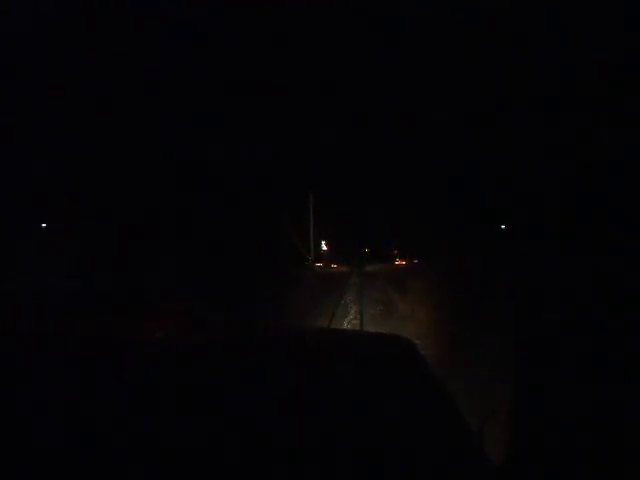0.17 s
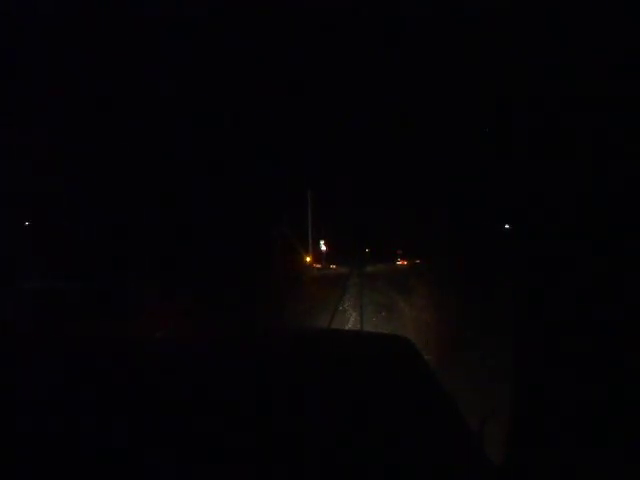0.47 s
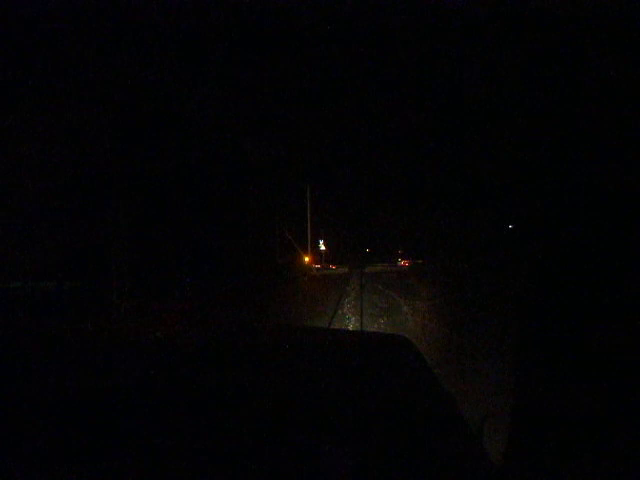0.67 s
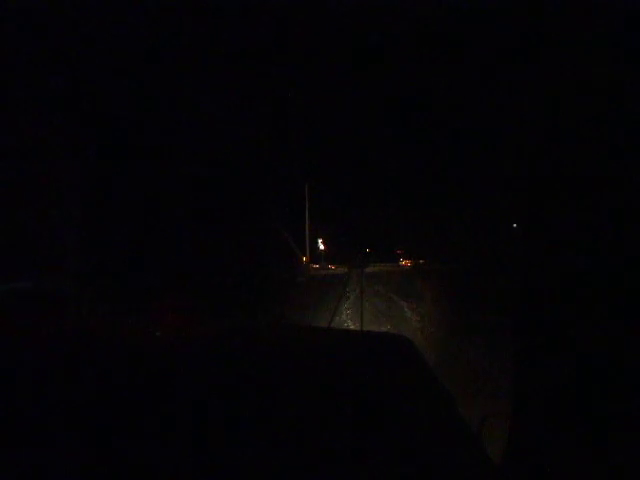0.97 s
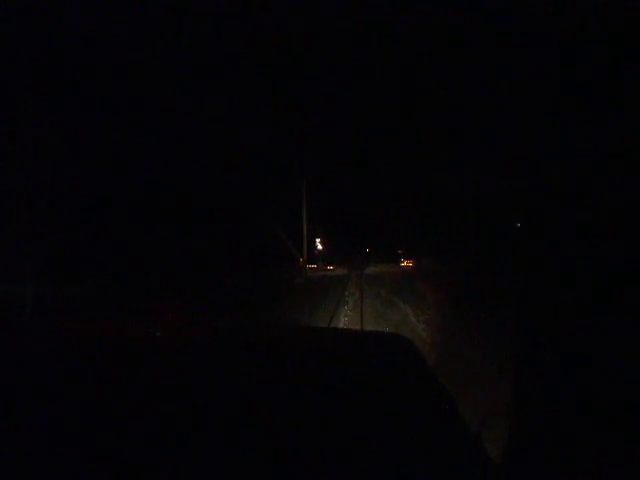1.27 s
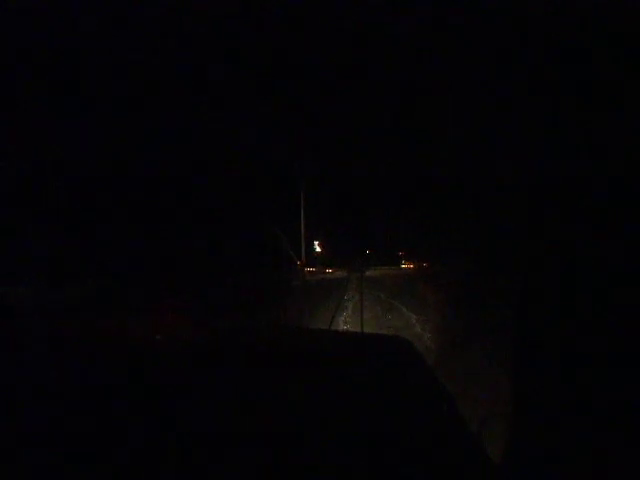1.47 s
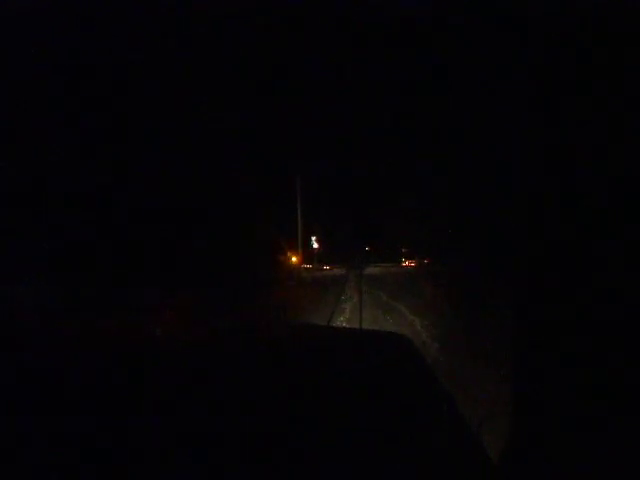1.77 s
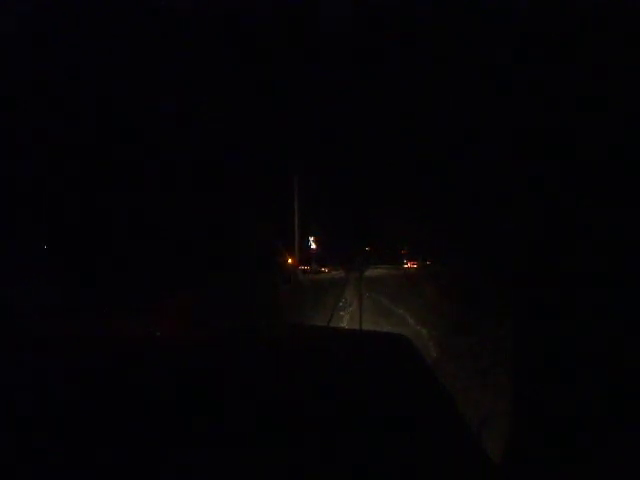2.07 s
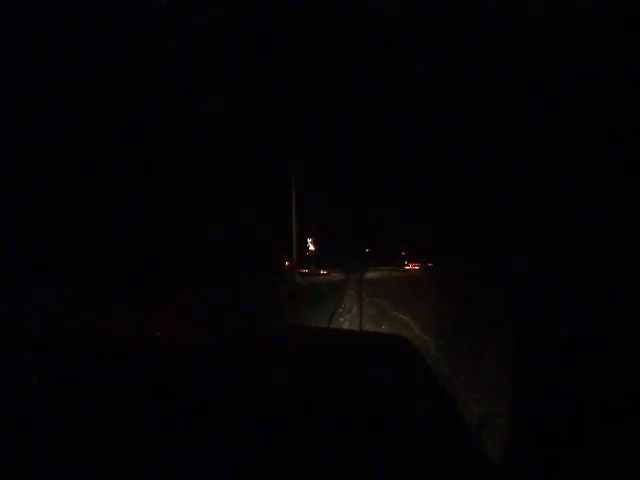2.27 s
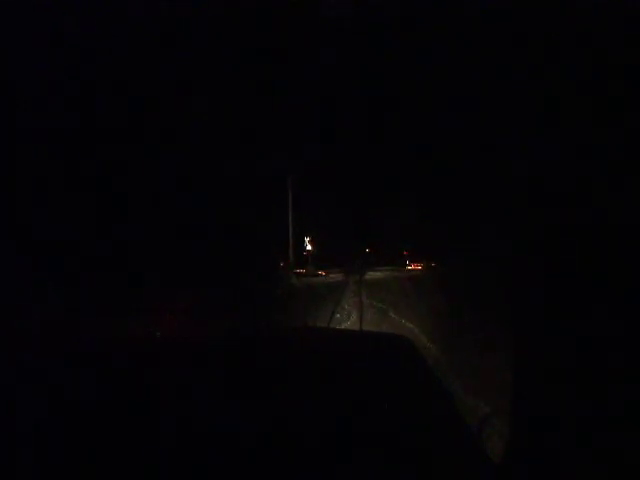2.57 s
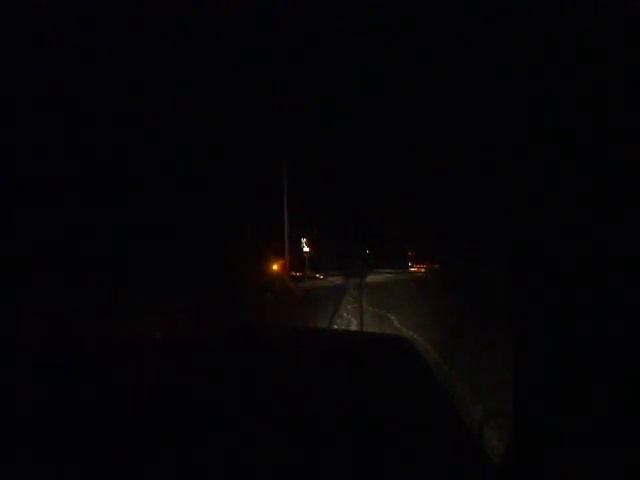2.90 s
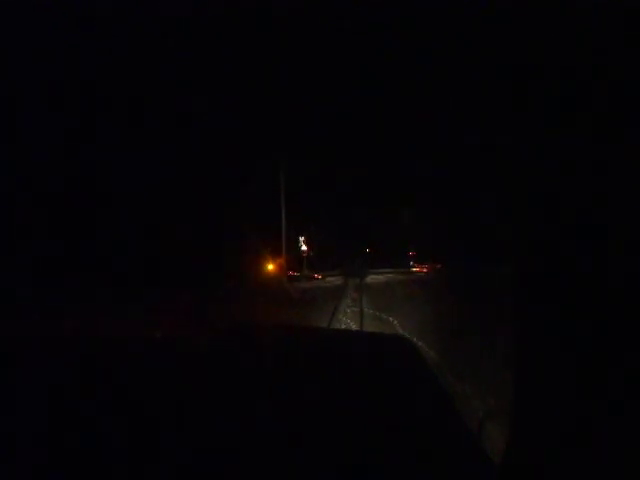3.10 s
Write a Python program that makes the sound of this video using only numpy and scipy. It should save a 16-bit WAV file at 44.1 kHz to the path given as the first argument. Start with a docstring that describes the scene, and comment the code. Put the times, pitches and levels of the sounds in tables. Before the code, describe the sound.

Locomotive horn sounds briefly at the start and near the end, over throbbing engine and hiss

```python
"""In the cab of a moving diesel locomotive, one microphone: a three-chime air horn gives two short blasts.
The first is already sounding. The chimes share one air valve: the lowest speaks first and hangs on longest
as the pressure drains; each is a stack of overtones, with a faint return from the trackside.
Underneath, the engine throbs in crankshaft orders and its blower and gears whine in steady tones;
shaped noise makes the rumbling wheels, the hissing air and a boom in the cab."""
import sys
import numpy as np
from scipy import signal
from scipy.fft import rfft, irfft
from scipy.io import wavfile
from scipy.ndimage import uniform_filter1d

SR = 44100
rng = np.random.default_rng(int(sys.argv[2]) if len(sys.argv) > 2 else 0)


def generate_wav(signal):
    """Clip the signal to [-1, 1] and save it as 16-bit WAV at the path in sys.argv[1]."""
    frames = np.transpose(np.atleast_2d(signal))
    scaled = np.clip(frames, -1, 1) * 32767
    pcm = np.round(scaled).astype(np.int16)
    wavfile.write(sys.argv[1], SR, pcm)


N = 142884
T = np.arange(N) / SR


def undb(db):
    """Decibels to gain."""
    return 10 ** (np.asarray(db) / 20)


def unit(x):
    """Scale to rms 1."""
    return x / np.sqrt(np.mean(x ** 2))


def walk(rate):
    """Smooth chance with spread near 1, changing about rate times a second."""
    hold = max(int(SR / rate), 2)
    held = np.repeat(rng.standard_normal(N // hold + 3), hold)[rng.integers(hold):]
    smooth = uniform_filter1d(uniform_filter1d(held, hold), hold)
    return 1.334 * smooth[:N]


def level_over_time(curve):
    """Level in dB at every sample, joined from (time, level) points."""
    return np.interp(T, *np.array(curve).T)


def swell(curve):
    """Gain that follows a level curve around its mean."""
    db = level_over_time(curve)
    return undb(db - db.mean())


def noise(gain):
    """Noise of rms 1 whose spectrum is gain(Hz)."""
    f = np.maximum(np.fft.rfftfreq(2 * N, 1 / SR), 1)
    spectrum = rfft(rng.standard_normal(2 * N)) * gain(f)
    return unit(irfft(spectrum)[:N])


def coloured(points):
    """Noise of rms 1 with a spectrum of (Hz, dB) points, joined on a log frequency scale."""
    hz, db = np.array(points).T
    return noise(lambda f: undb(np.interp(np.log(f), np.log(hz), db)))


def resonance(hz, width):
    """Noise of rms 1 gathered around one resonance; its amplitude halves at width from the centre."""
    return noise(lambda f: 1 / (1 + ((f - hz) / width) ** 2))


def turns(hz):
    """Phase in radians of something that turns at hz."""
    return 2 * np.pi * np.cumsum(hz) / SR


def tone(phase):
    """A partial of rms 1 that starts anywhere in its cycle."""
    return np.sqrt(2) * np.sin(phase + 2 * np.pi * rng.random())


# spectrum of the rolling rumble: (frequency [Hz], relative level per Hz [dB])
RUMBLE_SPECTRUM = [(10, -23), (25, -16.5), (40, -4.5), (54, 3), (70, -6), (88, 2.5), (110, -11),
                   (135, -3.5), (165, -15), (210, -11), (245, -13), (330, -15.5), (400, -15.5),
                   (500, -18.5), (700, -22.5), (930, -19.5), (1150, -29), (2000, -44), (5000, -59.5)]
RUMBLE_DB, RUMBLE_SWELL_DB = -26, 1.5
RUMBLE_DEPTH = .3  # share of the engine drone's swell, in dB, that the rumble follows


def rumble():
    """Wheels and body shake the cab: low noise, partly swelling with the engine."""
    level = undb(RUMBLE_DB + RUMBLE_SWELL_DB * walk(9.96))
    return level * swell(DRONE_LEVEL) ** RUMBLE_DEPTH * coloured(RUMBLE_SPECTRUM)


# spectrum of the air hiss: (frequency [Hz], relative level per Hz [dB])
HISS_SPECTRUM = [(500, -24), (1200, -1), (1550, 1.5), (2100, -2.5), (2800, -1), (3800, -1.5), (5000, 0.5),
                 (5800, -0.5), (6400, 1.5), (6950, -2), (7500, -3.5), (8000, -4), (8500, -16),
                 (9000, -42.5)]
# ringing of the ducts: (centre [Hz], width [Hz], level before flicker and treble swell [dB])
DUCTS = [(2840, 150, -51), (3173, 140, -44.5), (4510, 270, -42.5), (4770, 100, -48), (5340, 81, -49.5),
         (7350, 220, -49)]
# rise and fall of the treble, heard relative to its mean: (time [s], level [dB])
TREBLE_LEVEL = [(0, -34), (.25, -34), (.5, -31.5), (.87, -29), (1.0, -29.5), (1.4, -29.5), (1.68, -31),
                (2.0, -29.5), (2.45, -29.5), (2.57, -31.5), (2.7, -32.5), (2.83, -32), (2.94, -28.5),
                (3.2, -30)]
HISS_DB = -34.5
HISS_FLICKER_DB, HISS_FLICKER_RATE_HZ = .6, 14


def air():
    """Rushing air: a broad, flickering hiss and the resonances of its ducts."""
    ducts = sum(undb(db + 1.5 * walk(10)) * resonance(hz, width) for hz, width, db in DUCTS)
    hiss = undb(HISS_DB) * coloured(HISS_SPECTRUM)
    flicker = undb(HISS_FLICKER_DB * walk(HISS_FLICKER_RATE_HZ))
    return swell(TREBLE_LEVEL) * flicker * (hiss + ducts)


# level of the boom in the cab: (time [s], level [dB])
BOOM_LEVEL = [(0, -54), (.3, -50), (.6, -38), (.9, -46), (1.5, -42), (1.85, -34), (2.05, -46), (2.2, -29.5),
              (2.48, -31.5), (2.62, -47), (2.95, -39), (3.08, -29), (3.24, -35)]
BOOM_HZ, BOOM_WIDTH_HZ = 210.8, 8.6


def boom():
    """A low resonance of the cab comes and goes."""
    return undb(level_over_time(BOOM_LEVEL)) * resonance(BOOM_HZ, BOOM_WIDTH_HZ)


# engine orders: (multiple of the crank rate, level before flutter, swell and trim [dB])
ENGINE_ORDERS = [(3, -37), (4, -28.5), (5, -41), (6, -38), (7, -38), (8, -22), (9, -30.5), (10, -44),
                 (12, -42), (19, -48), (24, -46), (26, -47), (30, -37), (35, -48.5), (36, -46)]
# rise and fall of the engine's drone, heard relative to its mean: (time [s], level [dB])
DRONE_LEVEL = [(0, -25), (.25, -24), (.45, -21.5), (.56, -16.5), (.8, -20.5), (1.15, -18), (1.6, -14.5),
               (2.0, -17.5), (2.3, -16), (2.47, -23.5), (2.65, -27.5), (2.85, -22), (3.12, -16.5),
               (3.24, -25)]
CRANK_HZ, CRANK_WANDER = 10.95, .004  # wander as a fraction of the rate
ORDER_FLUTTER_DB, ENGINE_TRIM_DB = 1.5, -0.5
DRONE_DEPTH = .5  # share of the swell, in dB, that orders far from the firing rate follow


def engine():
    """Orders of the crankshaft beat against each other once a turn, each a little unsteady."""
    crank = turns(CRANK_HZ * (1 + CRANK_WANDER * walk(8)))
    full_swell = swell(DRONE_LEVEL)
    part_swell = full_swell ** DRONE_DEPTH
    orders = np.zeros(N)
    for k, db in ENGINE_ORDERS:
        drone = full_swell if 8 <= k <= 12 else part_swell  # 8 to 12: near the firing rate
        orders += drone * undb(db + ORDER_FLUTTER_DB * walk(14)) * tone(k * crank)
    return undb(ENGINE_TRIM_DB) * orders


# blower whine: (multiple of the lobe rate, level before flutter and swells [dB])
BLOWER_TONES = [(8, -45.5), (10, -57), (12, -54.5), (13, -50.5), (14, -49), (19, -61), (21, -60.5),
                (24, -49.5), (31, -60), (32, -45.5), (40, -62)]
# gear tones: (frequency [Hz], level before flutter and swells [dB])
GEAR_TONES = [(867, -49.5), (1201, -51.5), (1244, -54.5), (3300, -52.5), (4317, -52.5), (4387, -55),
              (4490, -51.5), (4603, -52), (5335, -56)]
# the blower's main whistle, before flutter: (time [s], level [dB])
WHISTLE_LEVEL = [(0, -46.5), (.25, -43), (.45, -39), (.66, -41.5), (.8, -36), (1.1, -42), (1.45, -36),
                 (1.8, -41.5), (2.0, -40), (2.25, -43), (2.6, -42), (2.95, -36.5), (3.24, -42)]
BLOWER_HZ, BLOWER_WANDER = 198.12, .0003  # lobe rate; wander as a fraction of it
WHISTLE_ORDER = 16  # multiple of the lobe rate
WHINE_FLUTTER_DB, WHINE_SWELL_DB = 2, 2
WHINE_ROUGH = 0.33  # phase jitter [rad]


def whine():
    """Blower and gear tones flutter on their way through the moving air; one blower tone whistles on top."""
    speed = turns(1 + BLOWER_WANDER * walk(6))  # phase of 1 Hz; all tones wander together

    def flutter(hz, db):
        """One tone, unsteady in level and phase."""
        level = undb(db + WHINE_FLUTTER_DB * walk(16))
        return level * tone(hz * speed + WHINE_ROUGH * walk(70))

    tones = [(k * BLOWER_HZ, db) for k, db in BLOWER_TONES] + list(GEAR_TONES)
    chorus = sum(flutter(hz, db) for hz, db in tones) * undb(WHINE_SWELL_DB * walk(4.06))
    whistle = flutter(WHISTLE_ORDER * BLOWER_HZ, level_over_time(WHISTLE_LEVEL))
    return swell(TREBLE_LEVEL) * chorus + whistle


SQUEAK_HZ, SQUEAK_DB = 1178, -33.5
SQUEAK_LATE_S, SQUEAK_S = 0.058, 0.017  # delay after the valve opens, half-length


def squeak():
    """A diaphragm squeaks briefly as the air first reaches the upper chimes."""
    shape = sum(np.exp(-((T - blast[0] - SQUEAK_LATE_S) / SQUEAK_S) ** 2) for blast in BLASTS)
    return undb(SQUEAK_DB) * shape * tone(turns(SQUEAK_HZ * (1 + 0.0055 * walk(60))))


# horn blasts: (valve opens [s], valve closes [s], pitch shift [%], level offset [dB],
# extra level of the low chime's overtones 2 to 4 [dB])
BLASTS = [(-.3, .145, -0.256, -1.1, -1), (2.435, 2.65, 0.031, -.2, 3)]
# chimes: (pitch before shifts [Hz], level before blast offset [dB], lateness [s], attack [s], release [s],
# pitch shift as the pressure drains [%], added pressure exponent per octave of overtone)
CHIMES = [(304.1, -21.5, .003, 0.025, 0.258, -0.336, 2.5), (369, -24.5, .04, 0.032, .185, 1.5, 1.8),
          (486, -27.5, 0.034, 0.03, 0.13, 1.0, .8)]
# overtones, one list per chime, joined in between: (multiple of its pitch, level re chime [dB])
OVERTONES = [
    [(1, 0), (2, -18.5), (3, -19.5), (4, -23), (5, -26), (6, -36), (9, -38), (10, -20), (11, -36),
     (19, -32), (26, -44)],
    [(1, -0.5), (2, -13.5), (3, -19.5), (4, -39), (8, -33), (14, -28), (21, -41)],
    [(1, 0.5), (2, -7.5), (3, -11.5), (4, -29), (6, -24), (7, -29), (8, -22), (12, -24.5), (15, -22),
     (16, -35)],
]
SCOOP_PCT, SCOOP_S = 0.96, .09  # each blast starts sharp and settles
FADE_POWER = 1.1  # how steeply the fundamental's amplitude follows pressure
HORN_WAVER, HORN_FLUTTER_DB = 0.00083, 0.72  # pitch waver as a fraction; flutter of the fundamental


def horn():
    """Three diaphragms buzz into their bells; air pressure sets loudness, brightness and pitch."""
    out = np.zeros(N)
    for (hz, chime_db, late, attack, release, drain_pct, brass), overtones in zip(CHIMES, OVERTONES):
        pressure, shift_pct, gain, bright = np.zeros((4, N))
        for opens, closes, pitch_pct, blast_db, bright_db in BLASTS:
            rise = np.clip((T - opens - late) / attack, 0, 1)
            fall = np.cos(np.pi / 2 * np.clip((T - closes) / release, 0, 1))
            on = (T > opens) & (T < closes + release)
            scoop = SCOOP_PCT * np.exp(-np.abs(T - opens) / SCOOP_S)
            pressure += rise * fall * on
            shift_pct += on * (pitch_pct + drain_pct * (1 - fall) + scoop)
            gain += on * undb(chime_db + blast_db)
            bright += on * bright_db * (hz == CHIMES[0][0])  # low chime only
        phase = turns(hz * (1 + shift_pct / 100 + HORN_WAVER * walk(30)))
        multiples, levels = np.array(overtones).T
        for k in range(1, int(round(multiples[-1])) + 1):
            flutter = HORN_FLUTTER_DB * np.sqrt(k) * walk(14)
            level = np.interp(k, multiples, levels) + bright * (1 < k < 5) + flutter
            # high overtones fade faster as pressure drops
            loudness = pressure ** (FADE_POWER + brass * np.log2(k))
            out += gain * undb(level) * loudness * tone(k * phase)
    return out


ECHO_DB, ECHO_T60_S = -21.5, 0.45
SLAP_DB, SLAP_S, SLAP_HZ = -18, .17, 490  # level, delay and centre of the narrow echo


def surroundings(x):
    """A faint, dull tail and one narrow echo come back from the trackside."""
    colour = coloured([(200, -5), (500, 7), (1000, -11.5), (8000, -13.5)])
    tail = colour * np.exp(-np.log(1000) * T / ECHO_T60_S)
    echo = signal.fftconvolve(x, tail / np.linalg.norm(tail))[:N]
    delayed = np.interp(T - SLAP_S, T, x, left=0)
    slap = signal.lfilter(*signal.iirpeak(SLAP_HZ, 5, fs=SR), delayed)
    return x + undb(ECHO_DB) * echo + undb(SLAP_DB) * slap


def scene():
    """The horn over the running noise of the cab, in one channel."""
    blasts = surroundings(horn() + squeak())
    cab = engine() + rumble() + boom() + whine() + air()
    return (blasts + cab)[None]


LIMIT_DB, LIMIT_WINDOW_S = -13.5, 0.025  # rms ceiling, averaging time
TOP_HZ = 8800


def record(dry):
    """The recorder's limiter holds the loudest moments down; the top is cut off."""
    power = uniform_filter1d(dry ** 2, max(int(LIMIT_WINDOW_S * SR), 2))
    gain = (1 + (power / undb(LIMIT_DB) ** 2) ** 2) ** (-1 / 4)
    lowpass = signal.ellip(10, .2, 85, TOP_HZ, fs=SR, output="sos")
    return signal.sosfilt(lowpass, dry * gain)


dry = scene()
out = record(dry)
generate_wav(out)
```